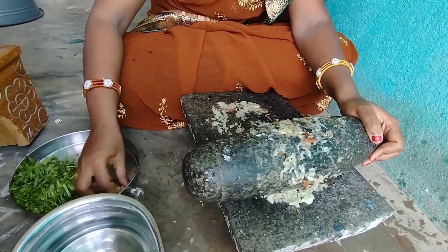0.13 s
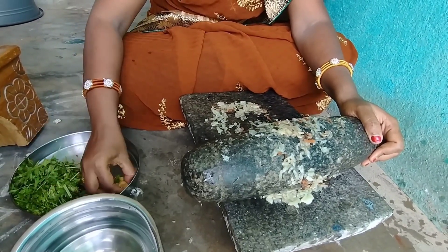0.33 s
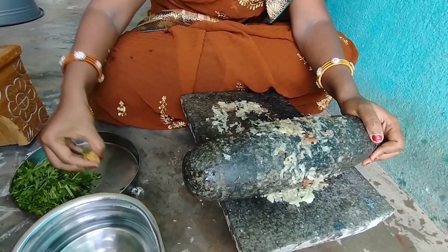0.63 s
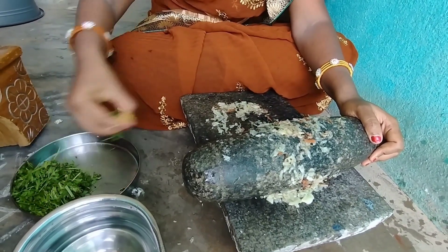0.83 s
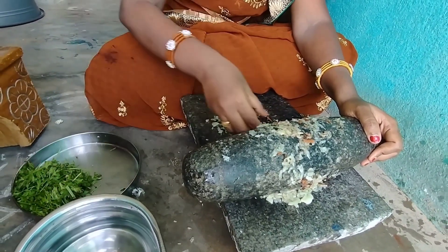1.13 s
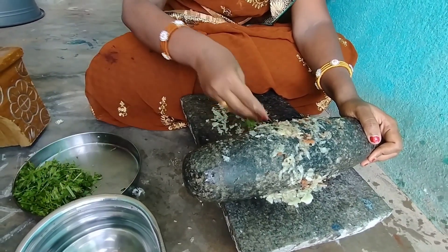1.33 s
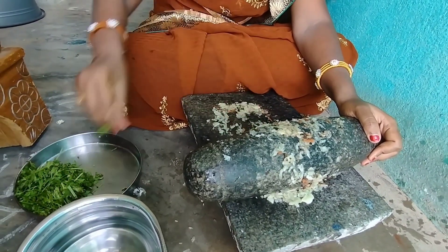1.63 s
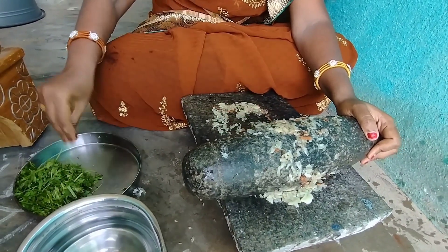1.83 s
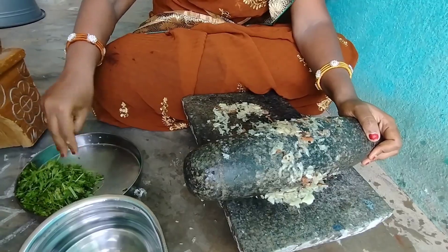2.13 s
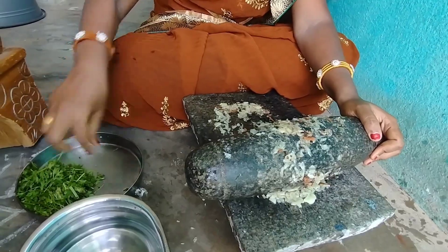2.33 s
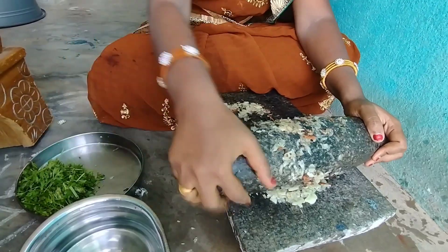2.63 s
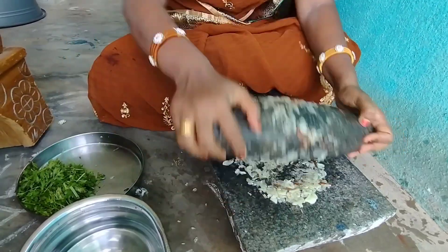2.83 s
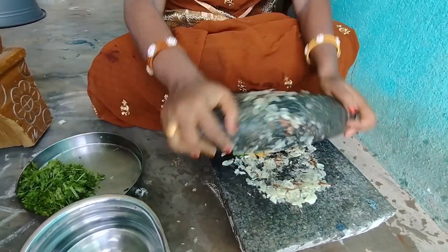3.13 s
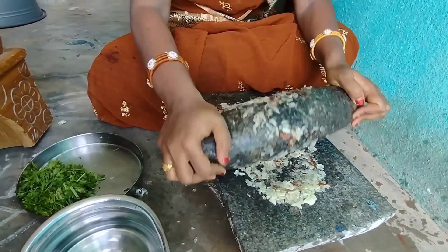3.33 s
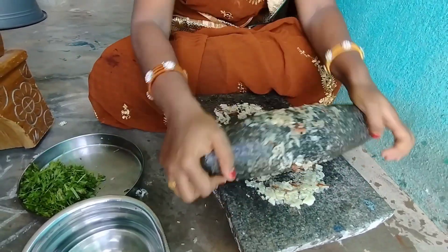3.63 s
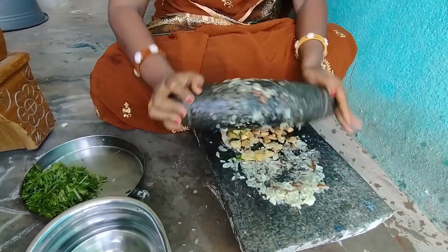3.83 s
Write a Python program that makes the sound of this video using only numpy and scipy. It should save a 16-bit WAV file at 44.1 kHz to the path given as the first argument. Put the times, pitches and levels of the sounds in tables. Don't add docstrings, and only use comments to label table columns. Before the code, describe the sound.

Stone roller knocks hard on a stone slab after bangles clink and fingers tap a steel plate

```python
import sys
import numpy as np
from scipy import signal
from scipy.fft import rfft, irfft
from scipy.io import wavfile
from scipy.ndimage import uniform_filter1d

SR = 44100
rng = np.random.default_rng(int(sys.argv[2]) if len(sys.argv) > 2 else 0)


def voltage_ratio(decibels):
    exponent = np.asarray(decibels, float) / 20
    return 10 ** exponent


def materialize(psi):
    bounded = np.clip(np.atleast_2d(psi).T, -1, 1)
    quanta = np.round(bounded * 32767).astype(np.int16)
    wavfile.write(sys.argv[1], SR, quanta)


N = 176400


def even(x):
    return x / np.sqrt(np.mean(x ** 2) + 1e-20)


def read(points, hz):
    point_hz, value = np.transpose(points)
    return np.interp(np.log(hz + 1), np.log(point_hz + 1), value)


def add(mix, start_s, sound):
    part = mix[round(start_s * SR):][:len(sound)]
    part += sound[:len(part)]


def colour(x, points):
    hz = np.fft.rfftfreq(x.shape[-1], 1 / SR)
    return even(irfft(rfft(x) * voltage_ratio(read(points, hz)), x.shape[-1]))


def lean(x, centre_hz, db_per_octave):
    hz = np.fft.rfftfreq(len(x), 1 / SR) + 1
    return irfft(rfft(x) * voltage_ratio(-db_per_octave * abs(np.log2(hz / centre_hz))), len(x))


def decay(t, t60_s):
    return voltage_ratio(-60 * t / t60_s)


def rings(modes, length_s=0.5, split=0.014):
    t = np.arange(0, length_s, 1 / SR)
    out = np.zeros(len(t))
    for hz, db, t60_s in modes:
        for side in (-rng.random(), rng.random()):
            sine = np.sin(2 * np.pi * (hz * (1 + split * side) * t + rng.random()))
            out += voltage_ratio(db) * decay(t, max(t60_s, 0.01)) * sine
    return out


def grains(per_s, spread_db):
    noise = rng.standard_normal(N)
    size = voltage_ratio(spread_db * np.minimum(rng.exponential(1, N), 4))
    return noise * size * (rng.random(N) < per_s / SR)


def pair(x, other, loose):
    other = signal.sosfilt(signal.butter(1, 800, "high", fs=SR, output="sos"), other)
    return np.array([x + loose * other, x - loose * other])


# pitch_hz, width_hz, level_db
BANGLE_BANDS = [(3700, 300, -3.5), (6230, 300, -1), (8310, 600, -12.5), (9100, 230, 4.5), (8543, 180, -5.5),
                (10260, 400, -2)]


def bangle_clicks():
    clicks = np.tile(even(grains(per_s=9800, spread_db=-1.0)), 2)
    modes = [(hz, db, 2.7 / max(width_hz, 90)) for hz, width_hz, db in BANGLE_BANDS]
    tuned = even(signal.oaconvolve(clicks, rings(modes, 0.06))[:2 * N])
    return clicks, tuned


# start_s, rustle_peak_db, plate_ring_db, t60_s, ring_pitch_hz
PICKS = [(0.1249, -36, -41, 0.28, 1080), (0.2244, -25, -23, 0.091, 784), (0.2412, -21.5, -37, 0.29, 1360),
         (0.291, -33.5, -42, 0.41, 1580), (0.3235, -37, -32, 0.17, 690), (0.3387, -21, -35, 0.11, 654),
         (0.3566, -35, -55, 0.043, 762), (0.6045, -32.5, -37.5, 0.088, 1390),
         (0.6368, -40.5, -42, 0.32, 1480), (0.65, -51, -36.5, 0.074, 1410), (0.683, -46, -26, 0.1, 1270),
         (0.705, -44, -40, 0.12, 1210), (0.7586, -46, -38, 0.17, 1210), (2.591, -84, -40.5, 0.057, 1290),
         (2.7888, -25.5, -38.5, 0.12, 980)]
# pitch_hz, level_db
PLATE_TONES = [(600, 3), (760, 8.5), (910, -22.5), (1130, -18), (1220, 1), (1310, -27.5), (1480, 6.5),
               (1545, -0.5), (1800, -1.5), (2000, -1)]
# pitch_hz, level_db (per Hz)
RUSTLE_COLOUR = [(1180, -18), (2000, -15), (2420, -6), (3580, -9.5), (4940, -12), (6310, -8), (7250, -4),
                 (8550, 2), (16000, -34)]


def finger_picks(clicks, tuned):
    t, out = np.arange(0, 0.4, 1 / SR), np.zeros(N + SR)
    rustle = 1.63 * colour(clicks, RUSTLE_COLOUR) + 0.5 * tuned
    shake = even(grains(per_s=3300, spread_db=-7.0))
    plate = rings([(hz, db, 0.24) for hz, db in PLATE_TONES], 0.23)
    plate = plate / np.linalg.norm(plate)
    plate_band = signal.butter(2, [500, 2100], "band", fs=SR, output="sos")
    tap = 1.4 * (abs(t - 0.0005) < 1 / SR)
    for start_s, rustle_db, ring_db, t60_s, hz in PICKS:
        here = slice(round(start_s * SR), round(start_s * SR) + len(t))
        fall = decay(t, max(t60_s, 0.02))
        add(out, start_s, voltage_ratio(rustle_db - 14.5) * fall * np.minimum(t / 0.0017, 1) * rustle[here])
        press = np.minimum(t / 0.0031, 1) * fall
        push = voltage_ratio(ring_db + 1.0) * (press ** 1.58 * shake[here] + tap)
        ring = voltage_ratio(-6.5) * signal.oaconvolve(push, plate)[:len(t)]
        ring = ring + voltage_ratio(10.0) * signal.sosfilt(plate_band, push)
        add(out, start_s, lean(ring, hz, db_per_octave=10.5))
    return out[:N]


# start_s, level_db, t60_s, rise_s, brightest_hz
CHINKS = [(0.2436, -36, .06, .001, 13000), (.298, -44, 0.041, .003, 9000), (.333, -34, 0.059, .008, 12500),
          (.6376, -48, 0.031, 0.00056, 8600), (.656, -50, 0.14, .002, 3800), (.664, -61, 0.026, .002, 8600),
          (0.681, -51.5, 0.15, 0.0024, 3700), (0.758, -48.5, 0.11, .0008, 3800),
          (2.7893, -23.5, 0.012, .0004, 8800), (2.7921, -29, 0.011, 0.00038, 13000),
          (2.807, -42.5, 0.066, 0.001, 6500), (2.858, -45, .04, 0.0017, 6200),
          (2.939, -42.5, 0.035, .002, 8500), (2.987, -50, .05, 0.003, 8800),
          (3.0627, -48.5, 0.03, .002, 6200), (3.1216, -51, 0.073, 0.00067, 8500),
          (3.489, -53.5, 0.028, 0.0018, 8500), (3.522, -46.5, 0.046, 0.0017, 6200),
          (1.627, -61, 0.13, 0.013, 4860), (1.916, -54, 0.045, 0.00078, 9300),
          (1.957, -58, 0.14, .001, 4670), (2.233, -54, 0.016, 0.00084, 4340),
          (2.286, -50, 0.02, 0.00046, 4650), (2.574, -51, 0.018, 0.00027, 5560),
          (2.586, -50, 0.099, 0.0017, 3380), (2.801, -28.5, 0.017, 0.0019, 6260),
          (2.844, -52, 0.075, 0.0087, 2960), (2.958, -39.5, 0.062, 0.05, 8900),
          (3.11, -46, 0.069, 0.0088, 4760), (3.264, -39.5, 0.15, 0.017, 8100),
          (3.287, -28, 0.024, 0.0055, 9200), (3.327, -37, 0.039, 0.0028, 9120),
          (3.396, -41.5, 0.12, 0.0033, 5900), (3.432, -37.5, 0.067, 0.0085, 8400),
          (3.552, -44.5, 0.094, 0.0094, 8500), (3.565, -33, 0.028, 0.0024, 8440),
          (3.568, -30, 0.034, 0.0065, 8410), (3.570, -37.5, 0.055, 0.0046, 2960),
          (3.611, -44, .08, 0.006, 8500)]


def bangle_chinks(clicks, tuned):
    t, out = np.arange(0, 0.4, 1 / SR), np.zeros(N + SR)
    ticks = [round((start_s + rise_s) * SR) for start_s, _, _, rise_s, _ in CHINKS]
    sharp = clicks + 3.5 * np.isin(np.arange(2 * N), ticks)
    crisp = even(signal.lfilter(*signal.butter(2, [2600, 14000], "band", fs=SR), sharp))
    metal = crisp + tuned
    for start_s, db, t60_s, rise_s, hz in CHINKS:
        at = round(start_s * SR)
        rise = np.minimum(t / max(rise_s, 0.0003), 1)
        shape = rise * decay(np.maximum(t - rise_s, 0), max(t60_s, 0.01))
        burst = even(lean(metal[at:at + len(t)], hz, db_per_octave=10.5))
        add(out, start_s, voltage_ratio(db) * shape * burst)
    return out[:N]


def blow(hz, cycles):
    u = np.arange(0, cycles / hz, 1 / SR) * hz
    return -np.sin(2 * np.pi * u ** 0.88) * np.tanh(3.3 * np.sin(np.pi * u / cycles) ** 2)


# start_s, peak_db, blow_pitch_hz, cycles, body_db
KNOCKS = [
    (3.0119, -9.5, 977, 2.3, -2.5),
    (3.3397, 4, 1131, 2.0, -15.5),
    (3.5904, -13.5, 463, 2.86, -1),
    (3.6133, -12, 1073, 2.0, -1.5),
]
# pitch_hz, level_db
CRACK = [(3600, -18), (5800, -26), (11000, -36)]
# delay_s, level_db, pitch_share
ECHOES = [(.0042, -14, .9), (.0062, -8.5, .55), (0.0111, -9, .85), (.0137, -2, 1.02), (0.0173, -8.5, .95),
          (.025, -5, .9), (0.031, -16, 0.79)]
# pitch_hz, level_db, t60_s
SLAB_TONES = [(184, 4, 0.078), (358, 3.5, .075), (428, -1.5, .07), (665, -6, .07), (730, 5.5, 0.12),
              (840, -4, .08), (910, -2, 0.073), (995, 0.5, 0.071), (1083, -4, .085), (1210, -4, .1),
              (1372, -6.5, .12), (1480, -1, .07), (1725, -2, .09), (1920, -12.5, .08)]
# pitch_hz, level_db, t60_s
ROLLER_TONES = [(3500, -35, .03), (3600, -50, .07), (4538, -34.5, 0.071), (5346, -55.5, .12),
                (6670, -52, .17)]


def knocks():
    blows, body = np.zeros(N), np.zeros(N)
    roller = rings(ROLLER_TONES, split=0.004)
    slab = rings(SLAB_TONES, split=0.0022) / len(SLAB_TONES) ** 0.5
    soft_start = np.minimum(np.arange(len(slab)) / 130, 1)
    for start_s, db, hz, cycles, body_db in KNOCKS:
        add(blows, start_s, voltage_ratio(db) * blow(hz, cycles))
        for crack_hz, crack_db in CRACK:
            add(blows, start_s + 0.0002, voltage_ratio(2.3 * db + crack_db) * blow(crack_hz, 2.2))
        for delay_s, echo_db, share in ECHOES:
            add(body, start_s + delay_s, voltage_ratio(db + body_db + echo_db) * blow(hz * share, cycles))
        dull = signal.lfilter(*signal.butter(3, 1.8 * hz, fs=SR), slab)
        add(body, start_s + 0.0015, voltage_ratio(db + body_db - 2) * dull * soft_start)
        add(body, start_s, voltage_ratio(db + 14.0 * np.log2(hz / 1100)) * roller)
    return blows, body


# start_s, level_db, pitch_hz
THUMPS = [
    (0.662, -42.5, 160),
    (0.746, -40.5, 175),
    (3.577, -27.5, 173.4),
]


def plate_thumps():
    out = np.zeros(N)
    for start_s, db, hz in THUMPS:
        u = np.arange(0, 2 / hz, 1 / SR) * hz
        add(out, start_s, -voltage_ratio(db) * np.sin(2 * np.pi * u) * np.sin(np.pi * u / 2) ** 2)
    return out


# time_s, level_db
DRAG = [
    (2.786, -78),
    (2.9, -56),
    (3.05, -54.5),
    (3.199, -60.5),
    (3.33, -62),
    (3.539, -60),
    (3.63, -58.5),
]
# pitch_hz, level_db (per Hz)
GRIT_COLOUR = [(35, -54), (60, -12.5), (149, 7.5), (323, -8.5), (1410, -6), (2470, -11), (3340, -11.5),
               (8920, 0.5), (16000, -18)]


def drag():
    time_s, db = np.transpose(DRAG)
    clumps = even(uniform_filter1d(uniform_filter1d(rng.standard_normal(N), 300), 300))
    press = voltage_ratio(np.interp(np.arange(N) / SR, time_s, db, left=-120) + 7.0 + 2.6 * clumps)
    return press * colour(grains(per_s=2600, spread_db=2.5), GRIT_COLOUR)


# time_s, pitch_hz, level_db
BIRD = [
    [(2.54, 1255, -62), (2.65, 1297, -74), (2.785, 1294, -61)],
    [(2.81, 1404, -60.5), (2.88, 1412, -56), (2.96, 1410, -68.5)],
]


def bird():
    out = np.zeros(N)
    for note in BIRD:
        time_s, hz, db = np.transpose(note)
        t = np.arange(time_s[0], time_s[-1], 1 / SR)
        waver_hz = 9 * even(uniform_filter1d(rng.standard_normal(len(t)), 600))
        turns = np.cumsum(np.interp(t, time_s, hz) + waver_hz) / SR
        tone = np.sin(2 * np.pi * turns) * signal.windows.tukey(len(t), 0.3)
        add(out, time_s[0], voltage_ratio(np.interp(t, time_s, db) + 4.0) * tone)
    return out


# pitch_hz, t60_s
ROOM = [(100, 0.45), (400, 0.25), (1500, 0.24), (5000, 0.12), (14000, 0.12)]


def room(x):
    taps = np.zeros((2, SR // 2))
    jitter = rng.integers(0, 20, (2, (SR // 2 - 101) // 20))
    at = np.arange(100, SR // 2 - 20, 20) + jitter
    np.put_along_axis(taps, at, rng.choice([-1., 1.], at.shape), 1)
    hz, t, z = signal.stft(pair(*taps, loose=0.12), SR, nperseg=256)
    fall = decay(t, np.maximum(read(ROOM, hz), 0.05)[:, None])
    tail = signal.istft(z * fall, SR, nperseg=256)[1]
    return signal.fftconvolve(x[None], tail / np.linalg.norm(tail[0]), axes=1)[:, :N]


# pitch_hz, level_db (per Hz)
HUSH_COLOUR = [(18, -33), (30, -20.5), (55, -15.5), (145, 0), (740, -4), (1460, -11.5), (2410, -18),
               (3400, -18.5), (16000, -29)]
# time_s, level_db
STIR = [
    (0, -62),
    (.3, -53.5),
    (.8, -55.5),
    (1.3, -60),
    (2.4, -61.5),
    (3.001, -52.5),
]


def hush():
    frames, hz = N // 256 + 5, np.fft.rfftfreq(1024, 1 / SR)
    a, b, c, d, patches = rng.standard_normal((frames, 513, 5)).T
    patches = even(uniform_filter1d(uniform_filter1d(patches, 10, 0), 10, 1))
    z = np.array([a + 1j * b, c + 1j * d]) * voltage_ratio(read(HUSH_COLOUR, hz)[:, None] + 0.5 * patches)
    air = even(signal.istft(z, nperseg=1024, noverlap=768)[1][:, :N])
    stir_db = np.interp(np.arange(N) / SR, *np.transpose(STIR))
    return pair(*air, loose=0.08) * voltage_ratio(stir_db - 0.33)


def scene():
    blows, body = knocks()
    body = body + plate_thumps()
    clicks, tuned = bangle_clicks()
    near = finger_picks(clicks, tuned) + bangle_chinks(clicks, tuned) + drag() + bird()
    tail = room(voltage_ratio(-14) * blows + voltage_ratio(-9.0) * body + voltage_ratio(-10.0) * near)
    air = hush()
    scatter = rng.standard_normal(150) * voltage_ratio(-np.arange(150) / 6)
    smeared = signal.oaconvolve(near, scatter / np.linalg.norm(scatter))[:N]
    sound = pair(near, smeared, loose=0.06) * voltage_ratio(-2.0) + blows + body + tail
    return signal.lfilter(*signal.butter(4, 98, "high", fs=SR), sound) + air


def low_pass(x):
    return signal.sosfilt(signal.butter(12, 16800, fs=SR, output="sos"), x)


PORT_DELAY = [0.000384, 0.000421]
PORT_ECHO = [0.67, 1]
PORT_LEVEL = [-2.5, 0.94]


def record(dry):
    cut_s, cut_fade_s, trail_s = 3.6243, 0.0012, 0.017
    hz = np.fft.rfftfreq(N, 1 / SR)
    echo = np.array(PORT_ECHO)[:, None] * hz ** 2 / (hz ** 2 + 900 ** 2) * voltage_ratio(-0.4 * hz / 1000)
    late = np.exp(-2j * np.pi * hz * np.array(PORT_DELAY)[:, None])
    comb = (1 - echo * late) / np.sqrt(1 + echo ** 2)
    balance = voltage_ratio(np.outer(PORT_LEVEL, 1 / (1 + (hz / 14000) ** 2)))
    x = irfft(rfft(dry) * comb * balance, N)
    x = x / (1 + (abs(x) / 0.99) ** 4) ** 0.25
    x = irfft(rfft(x) * np.clip((15900 - hz) / 300 + 0.5, 0.02, 1), N)
    after_s = np.arange(N) / SR - cut_s
    trail_fade = np.cos(np.pi / 2 * np.clip(after_s / trail_s, 0, 1))
    trail = signal.lfilter(*signal.butter(8, 3840, fs=SR), x) * voltage_ratio(-32.5) * trail_fade
    fade = np.cos(np.pi / 2 * np.clip(after_s / cut_fade_s + 0.5, 0, 1)) ** 2
    return low_pass(fade * x + (1 - fade) * trail)


dry = scene()
out = record(dry)
materialize(out)
```